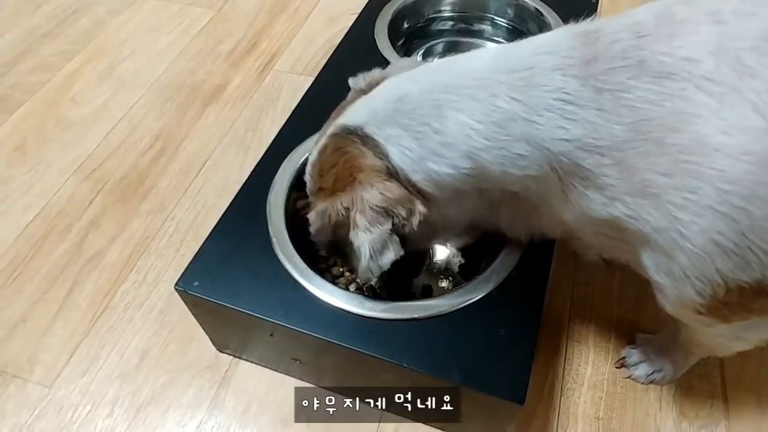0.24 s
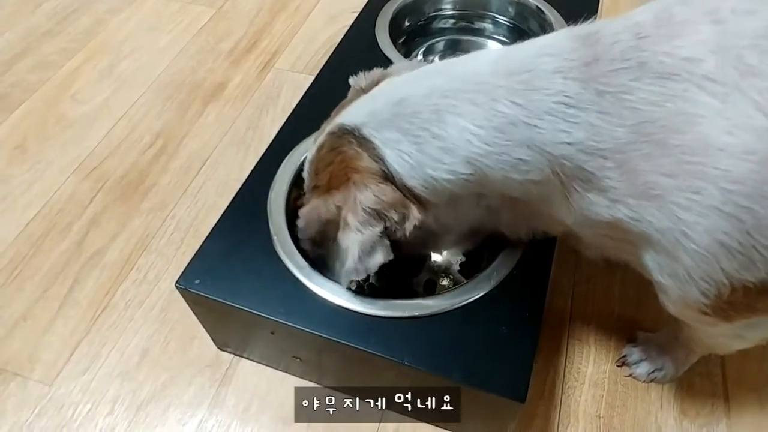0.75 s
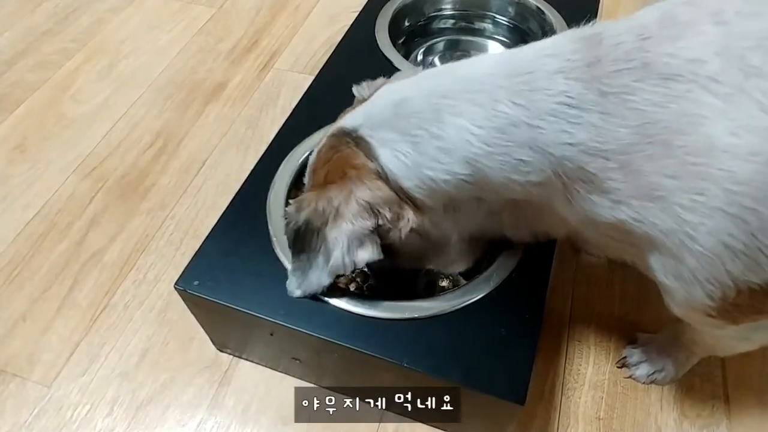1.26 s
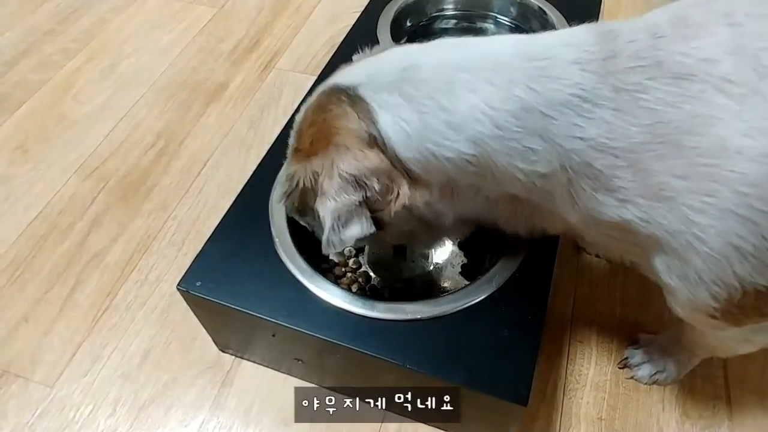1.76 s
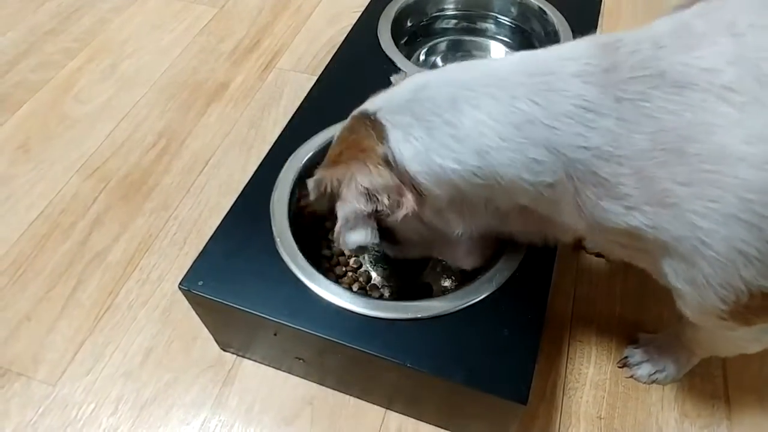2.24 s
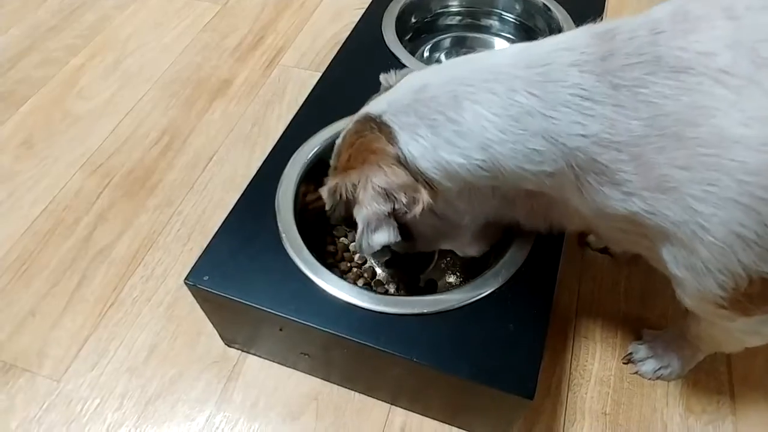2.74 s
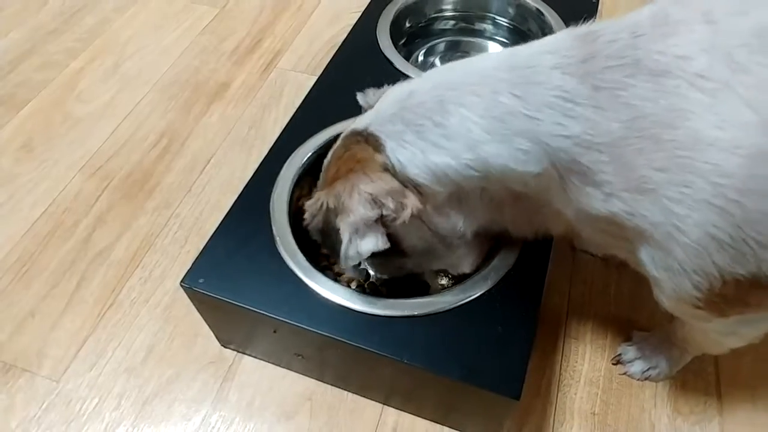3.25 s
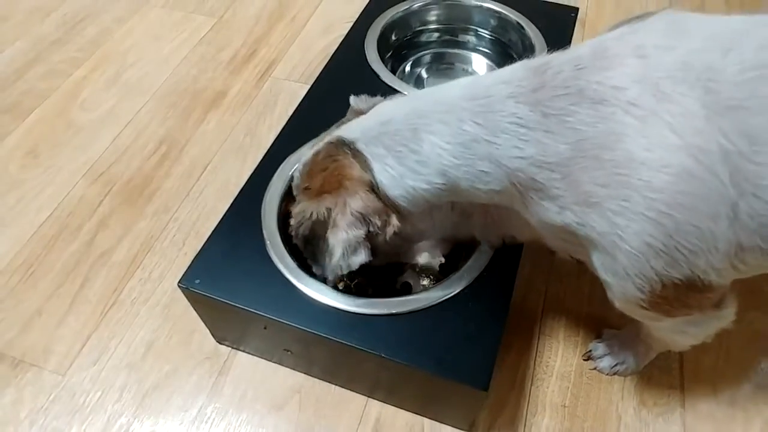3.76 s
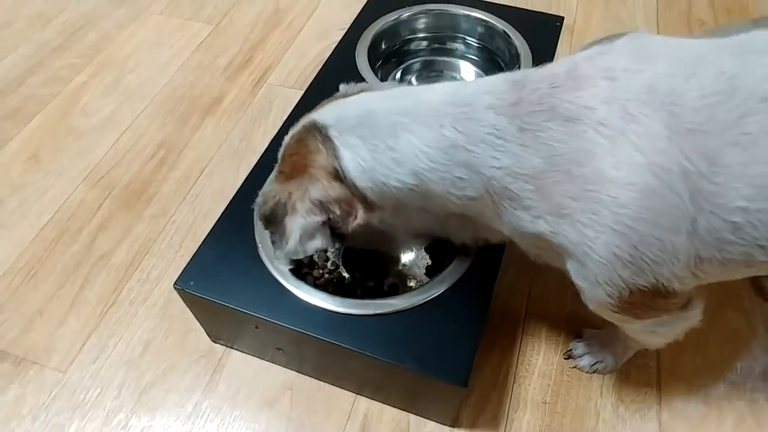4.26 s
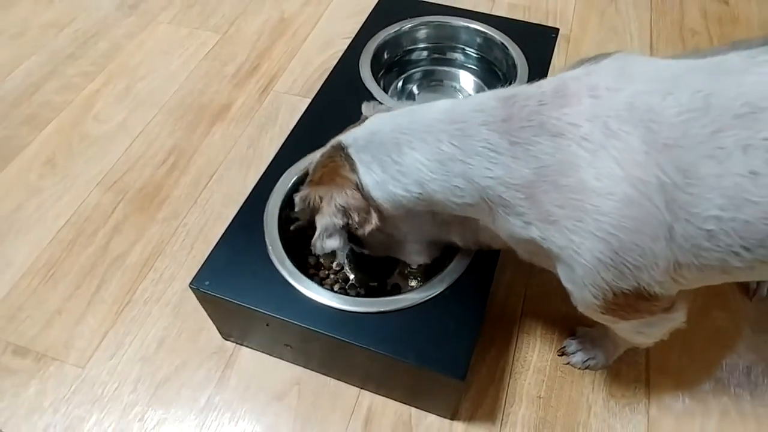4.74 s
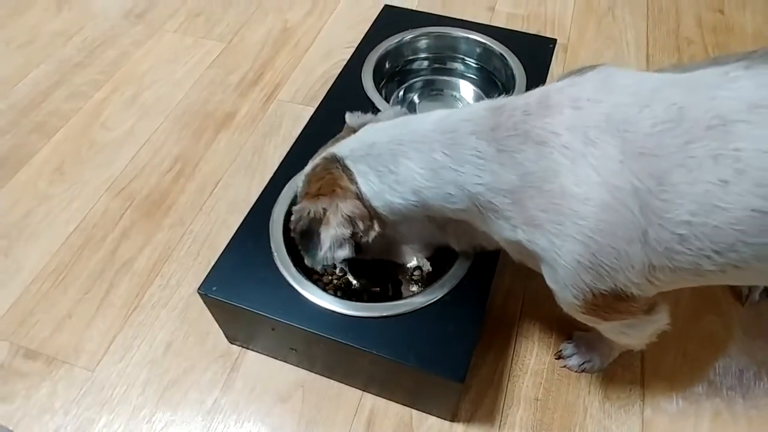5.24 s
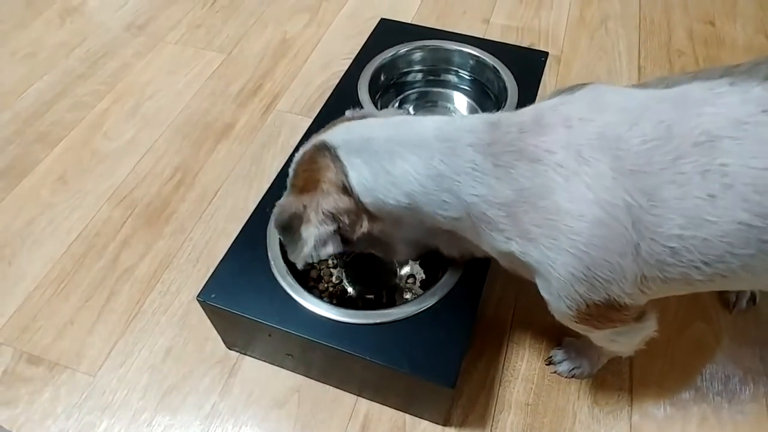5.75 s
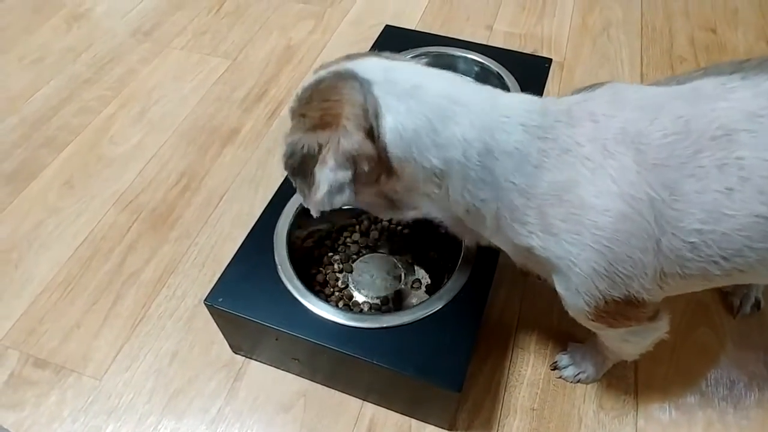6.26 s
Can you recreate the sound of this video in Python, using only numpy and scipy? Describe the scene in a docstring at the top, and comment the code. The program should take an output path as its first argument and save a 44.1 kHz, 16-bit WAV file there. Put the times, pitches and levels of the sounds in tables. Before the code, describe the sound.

A small dog eats dry kibble from a steel bowl in a hard-floored room. A sharp clink comes almost at once, then scattered crunches and soft wet smacks. A metal tag clanks on the bowl around 1.6 seconds. After a quieter stretch, louder knocks and ringing come near 4 and 4.7 seconds, then thin out. Close stereo microphone, short room reflections, faint rumble and hiss.

```python
"""A small dog eats dry kibble from a steel bowl set in a stand, in a room with a hard floor.
From the start: rumble, hiss and drone of filtered noise, and faint jaw ticks until 5.5 s.
From 0.07 s: teeth and pellets knock (band-passed contacts); the tongue smacks and stirs (resonant ticks).
From 0.14 s: square hits ring the bowl (decaying sines). At 0.18 s and twice near 1.6 s: a loose piece of
metal, probably a collar tag, clanks on it (crack, decaying sines, buzz). The room reflects all eating sounds."""
import sys
import numpy as np
from scipy import signal
from scipy.io import wavfile

SR = 44100
rng = np.random.default_rng(int(sys.argv[2]) if len(sys.argv) > 2 else 0)


def to_wav(sig):
    """Store sig (one row per channel, or 1-D mono) as 16-bit WAV at the path in sys.argv[1].

    Samples outside -1..1 are clipped; the rate is SR.
    """
    pcm = np.clip(np.atleast_2d(sig), -1, 1) * 32767
    pcm = np.round(pcm).astype(np.int16)
    wavfile.write(sys.argv[1], SR, pcm.T)  # frames by channels


N = 286650

# room tone spectrum, relative: centre_hz, density_db [dB per Hz]
ROOM_TONE_SPECTRUM = [(12, -40), (20, -10), (64, 3), (103, -20), (151, -15), (511, -39), (3000, -58),
                      (4700, -43), (6600, -62), (9500, -57), (13000, -72), (15000, -75)]
# left-right correlation of the room tone: centre_hz, correlation [-1..1]
ROOM_TONE_LIKENESS = [(30, 0.22), (70, 0.53), (150, 0.51), (400, 0.5), (1500, 0.18), (8000, 0.085)]
# swell of the lowest rumble, only its shape about the mean is used: time_s, level_db
RUMBLE_SWELL = [(0.0, -59.5), (1.41, -65.5), (2.79, -61.5), (3.31, -65), (6.06, -63.5), (6.5, -60.5)]
# low drone of the room: centre_hz, width_hz, level_db
DRONE_BANDS = [(49.6, 4, -66.5), (72.5, 9.5, -66.5), (154.3, 31, -63.5), (292, 6.7, -74)]
# steel bowl modes: pitch_hz, relative_db, t60_s
BOWL_MODES = [(475, -17, .18), (632, -12, .2), (739, -14, .2), (1290, -16, .17), (1545, -15, .17),
              (1952, -9, .24), (2466, -14, .15), (2772, -11, .15), (3086, 0, .19), (3420, -16, .15),
              (3790, -11, .2), (3973, -17, .14), (4413, 1, .16), (4445, -3, .09), (4560, -14, .13),
              (5039, -11, .2), (5157, -16, .2), (5868, -17, .19), (6150, -23, .15), (7072, -11, .19),
              (7480, -17, .14), (7677, -19, .18), (9810, -23, .11)]
# room decay: centre_hz, t60_s
ROOM_DECAY = [(300, 0.19), (600, 0.24), (1400, 0.22), (3000, 0.26), (6000, 0.17), (12000, 0.18)]
# reverberation over direct sound: centre_hz, level_db
ROOM_LEVEL = [(300, -5), (450, 1), (750, -2), (1400, -5), (3000, -6.5), (6000, -6), (12000, -9)]
# teeth and pellets on the bowl: start_s, strength_db [relative], hardness_db [treble over bass]
KNOCKS = [(0.0684, -43.5, -12.5), (0.1405, -16, 11.5), (0.1822, -37.5, 7), (0.2544, -26.5, 1),
          (0.268, -36, -14), (0.4842, -45.5, 4.5), (0.586, -42.5, 1.5), (0.6026, -54, 16),
          (0.6169, -23.5, -3.5), (0.6654, -40.5, -22), (0.8361, -39.5, -1), (0.8435, -41.5, 6.5),
          (0.892, -35.5, -2.5), (0.982, -53.5, -0.5), (1.1944, -54, -17), (1.4902, -46, -10),
          (1.534, -62.5, 19.5), (1.573, -34, -8), (1.5779, -31.5, 7.5), (1.6484, -17.5, 10.5),
          (1.786, -40, -0.5), (1.8091, -35.5, -10.5), (2.1262, -46, -15), (2.41, -50, -18),
          (2.4541, -49.5, -14), (2.5257, -53.5, -13), (2.6674, -28.5, 1), (2.7029, -27, -7),
          (2.7884, -31.5, -7.5), (2.972, -51, -2.5), (3.1166, -56, 12), (3.2032, -69, 18),
          (3.2263, -61, 16), (3.499, -39.5, -4.5), (3.5504, -38.5, -14), (3.7925, -41.5, -1.5),
          (3.9516, -29.5, 1), (3.9785, -16, -2), (4.0225, -26.5, -1), (4.2257, -24.5, 3.5),
          (4.4776, -44, -2), (4.6353, -29, -11.5), (4.6701, -25.5, -4), (4.6772, -26, -0.5),
          (4.699, -20.5, 4.5), (4.7807, -36, -9), (4.8312, -30, 11), (4.838, -37.5, 13),
          (5.0276, -27.5, 4.5), (5.069, -24.5, -1), (5.3512, -51, 13.5), (5.4037, -51, 11),
          (5.5888, -29.5, 2.5), (5.6142, -27, -1.5), (5.9086, -51, -5), (6.3406, -62, -10)]
# registers of a knock, thud to snap: low_hz, high_hz, crumble_t60_s, relative_db,
# hardness_share [dB per dB of hardness], pan_db [left over right]
KNOCK_REGISTERS = [(470, 1000, 0.013, 0.32, 0, 1.5), (1250, 2000, 0.0065, -1, 0.035, 2.5),
                   (2530, 3000, .011, -0.5, 0.92, -9.5), (3360, 6000, 0.025, -13.5, 1.0, 11),
                   (7400, 8800, 0.0054, -24, .5, 3)]
# tongue strokes: start_s, length_s, smack_db [relative], rustle_db [relative to smack]
TONGUE_STROKES = [(0.074, .06, -50, -2.5), (0.415, .073, -54, -19), (0.554, .058, -41, -19),
                  (0.812, .044, -49.5, -18), (1.021, .03, -57.5, -12.5), (1.124, .036, -60, -13.5),
                  (1.297, .06, -47.5, -13), (1.351, .078, -53.5, -16.5), (1.493, .1, -52, -5),
                  (2.099, .062, -59.5, -4.5), (2.3, .19, -58, -16.5), (2.602, .07, -52, -17.5),
                  (2.68, .075, -39.5, -8), (2.8, .1, -55.5, -19), (3.069, .045, -49, -10.5),
                  (3.132, .09, -64.5, 3), (3.314, .064, -60.5, -10), (3.523, .09, -51.5, -11),
                  (3.758, .096, -49.5, -5), (3.926, .06, -44.5, -8), (3.993, .03, -36, 1),
                  (4.361, .068, -59.5, -7.5), (4.577, .085, -39, -14.5), (4.698, .02, -27.5, -2.5),
                  (4.735, .06, -37, -8.5), (4.861, .09, -42.5, -7.5), (4.993, .075, -41.5, -9),
                  (5.324, .053, -56.5, -3), (5.485, .1, -48.5, -10.5), (5.594, .07, -43, -3.5)]
# square hits on the bowl wall: start_s, strength_db [relative]
BOWL_HITS = [(0.1412, -45.5), (0.8435, -40.5), (1.6487, -31.5), (2.6674, -35), (3.9785, -18),
             (4.6779, -23.5), (4.6985, -32.5), (5.069, -34.5), (5.3513, -60), (5.6142, -52.5)]
# collar tag against the bowl: start_s, strength_db [relative]
TAG_HITS = [(0.183, -28.5), (1.5777, -23), (1.65, -31)]
# collar tag modes: pitch_hz, relative_db, t60_s
TAG_MODES = [(1760, -4, .28), (1885, -5, .3), (2062, -17, .25), (2272, -13, .3), (2507, -2, .17),
             (2790, -9, .17), (3128, -14, .22), (3499, -14, .3), (3651, -4, .24), (3715, -6, .2),
             (3838, -8, .22), (4037, -10, .2), (4242, -15, .22), (4885, -5, .26), (5308, -7, .17),
             (5450, -9, .15), (6062, -14, .25), (6998, -14, .2), (8190, -12, .17), (8269, -10, .18),
             (8565, -17, .17), (9523, -21, .14), (10170, -20, .2)]


def from_db(db):
    """Decibels to amplitude."""
    return 10 ** (np.asarray(db) / 20)


def rms_one(x):
    """Scales to unit rms."""
    return x / np.sqrt(np.mean(x ** 2) + 1e-20)


def at_hz(points, hz):
    """Reads a table on a log-frequency axis."""
    points = np.array(points)
    return np.interp(np.log(hz), np.log(points[:, 0]), points[:, 1])


def butter(x, hz, kind, order=2):
    """Causal Butterworth filter."""
    hz = np.clip(hz, 10, SR / 2 - 500)
    return signal.sosfilt(signal.butter(order, hz, kind, fs=SR, output="sos"), x)


def panned(x, pan_db):
    """Sets left over right at constant power; mono becomes stereo."""
    return rms_one(from_db([[pan_db / 2], [-pan_db / 2]])) * x


def add(out, start_s, sound):
    """Mixes a sound in at a given time."""
    i = round(start_s * SR)
    out[..., i:i + sound.shape[-1]] += sound[..., :N - i]


def noise_bands(size, count=19):
    """Half-octave bands of noise, as (centre Hz, 2 unrelated channels x size); neighbours are unrelated."""
    white = rng.standard_normal((2, 2, size + SR // 2))
    edges_hz = 22 * 2 ** (np.arange(count + 1) / 2)
    for k, (low_hz, high_hz) in enumerate(zip(edges_hz, edges_hz[1:])):
        band = butter(white[k % 2], [low_hz, high_hz], "band")
        yield np.sqrt(low_hz * high_hz), band[:, -size:]   # filter onset dropped


def correlated(mid, side, likeness):
    """Two noises to a stereo pair of given correlation."""
    return np.sqrt(1 + likeness) * mid + np.sqrt(1 - likeness) * side * [[1], [-1]]


def grains(size, per_s, spread_db):
    """Random tiny contacts of uneven strength and either sign."""
    strength = from_db(spread_db * np.minimum(rng.exponential(1, size), 3.5))
    return (rng.random(size) < per_s / SR) * strength * rng.choice([-1, 1], size)


def room_tone(level_db=-60, pan_db=-2.0, rumble_top_hz=90, swell_share=.8):
    """Low rumble that swells and sinks, under a faint even hiss: noise bands, partly alike left and right."""
    rumble_db = np.interp(np.arange(N) / SR, *np.transpose(RUMBLE_SWELL))
    swell = from_db(swell_share * (rumble_db - rumble_db.mean()))
    out = 0
    for hz, (mid, side) in noise_bands(N):
        gain = from_db(at_hz(ROOM_TONE_SPECTRUM, hz)) * (swell if hz < rumble_top_hz else 1)
        out = out + gain * correlated(mid, side, at_hz(ROOM_TONE_LIKENESS, hz))
    return panned(from_db(level_db) * rms_one(out), pan_db)


def drone(apart=0.75, pan_db=-1.5):
    """Narrow bands of noise, largely alike left and right."""
    white = rng.standard_normal(N + SR) + apart * rng.standard_normal((2, N + SR))
    out = 0
    for hz, width_hz, db in DRONE_BANDS:
        band = butter(white, [hz - width_hz / 2, hz + width_hz / 2], "band", order=1)
        out = out + from_db(db) * rms_one(band[:, SR:])
    return panned(out, pan_db)


def chewing(end_s=5.5, level_db=-71.0):
    """Faint dull ticks of the jaws, band-passed grains, until the dog lifts its head."""
    ticks = butter(grains(N, per_s=120, spread_db=4), [550, 2100], "band")
    return from_db(level_db) * rms_one(ticks) * (np.arange(N) < end_s * SR)


def mode_ring(modes, damped_db, damped_t60_s, contact_s=.0002):
    """One blow: modes of uneven strength, losing energy fast while the contact lasts, then ringing freely."""
    t = np.arange(SR // 2) / SR
    out = 0
    for hz, mode_db, t60_s in modes:
        strength = from_db(mode_db + rng.uniform(-0.24, 0.67, (2, 1)) - 60 * t / t60_s)
        skew_rad = rng.normal(0, 0.068) * np.array([[1], [-1]])   # small left-right phase offset per mode
        out = out + strength * np.sin(2 * np.pi * hz * t + skew_rad) * rng.choice([-1, 1])
    damped = from_db(damped_db - 60 * t / damped_t60_s)
    rise = 1 - np.exp(-t / contact_s)
    return out * (1 + damped) * rise


def bowl_colour(x, level_db=-20.5):
    """Contacts and mouth sounds in the bowl set its modes ringing a little, by convolution."""
    response = mode_ring(BOWL_MODES, damped_db=-0.5, damped_t60_s=0.041)
    response *= np.sqrt(2) / np.linalg.norm(response)
    return from_db(level_db) * signal.fftconvolve(x, response, axes=1)[:, :N]


def room(x, likeness=0.24, alike_below_hz=450, build_s=0.0029):
    """Dense reflections from bowl, floor and walls build up within ms and die away by band."""
    t = np.arange(SR // 2) / SR
    build = 1 - np.exp(-(t / build_s) ** 2)
    response = 0
    for hz, (mid, side) in noise_bands(len(t)):
        # long waves arrive alike left and right
        alike = min(likeness + 1 / (1 + (hz / alike_below_hz) ** 2), .95)
        decay = from_db(-60 * t / at_hz(ROOM_DECAY, hz)) * build
        envelope = decay / np.linalg.norm(decay) * from_db(at_hz(ROOM_LEVEL, hz))
        response = response + correlated(mid, side, alike) / np.sqrt(2) * envelope
    return signal.fftconvolve(x, response, axes=1)[:, :N]


def stand_thump(mouth, level_db=-10, top_hz=340):
    """The stand adds a dull thump: the low end of the contacts and mouth sounds, in mono."""
    return from_db(level_db) * butter(mouth.mean(axis=0), top_hz, "low")


def contact(register, crumble=1.8, level_db=-3.5, level_over_s=.008, rise_s=0.00023, pan_scatter_db=2.5):
    """A sharp contact and a few ms of crumbling in one register; no two are at quite the same spot."""
    low_hz, high_hz, t60_s, _, _, pan_db = register
    t = np.arange(SR // 32) / SR
    envelope = from_db(-60 * t / t60_s) * (1 - np.exp(-t / rise_s))
    force = grains(len(t), per_s=9000, spread_db=2.5) * envelope
    force *= crumble / np.linalg.norm(force)
    force[0] += 1   # the sharp contact
    sound = butter(force, [low_hz, high_hz], "band")
    sound *= from_db(level_db) * np.sqrt(level_over_s * SR) / np.linalg.norm(sound)
    return panned(sound, pan_db + pan_scatter_db * rng.standard_normal())


def knocks(events, top_hz=11300):
    """Every knock sounds every register; the harder the contact, the stronger the upper ones."""
    out = np.zeros((2, N))
    for start_s, strength_db, hardness_db in events:
        sound = 0
        for register in KNOCK_REGISTERS:
            relative_db, hardness_share = register[3:5]
            gain = from_db(strength_db + relative_db + hardness_share * hardness_db)
            sound = sound + gain * contact(register)
        sound[1] = np.roll(sound[1], rng.integers(3))   # path to the right differs by spot: 0-2 samples
        add(out, start_s, sound)
    return butter(out, top_hz, "low", order=8)


def crackle(size, centre_hz, scatter, per_s, count=5):
    """Sparse ticks dealt to a few short resonances scattered around one pitch; rms 1."""
    offsets = np.linspace(-1, 1, count) + rng.normal(0, .2, count)
    out = 0
    for hz in centre_hz * np.exp(scatter * offsets):
        ticks = grains(size, per_s / count, spread_db=5)
        out = out + butter(ticks, [hz * .88, hz * 1.12], "band")
    return rms_one(out)


def licks(wet_db=-5.5, squelch_db=-8, rustle_offset_db=-2.5, pan_db=-2.5):
    """Wet ticks resonate in the mouth, with a narrow squelch, while pellets rub; strokes swell and fade."""
    squelch_width_hz, taper = 200, 0.8
    out = np.zeros(N)
    for start_s, length_s, smack_db, rustle_db in TONGUE_STROKES:
        size = round(length_s * SR)
        mouth_hz = 1367 * np.exp(0.029 * rng.standard_normal())   # varies from stroke to stroke
        wet = crackle(size, mouth_hz, scatter=.27, per_s=800)
        rustle = crackle(size, 3500, scatter=0.12, per_s=1200)
        squelch_hz = [mouth_hz - squelch_width_hz / 2, mouth_hz + squelch_width_hz / 2]
        squelch = rms_one(butter(wet, squelch_hz, "band", order=1))   # narrow ring of the mouth cavity
        stroke = from_db(wet_db) * wet + from_db(squelch_db) * squelch
        stroke = stroke + from_db(rustle_db + rustle_offset_db) * rustle
        envelope = rms_one(signal.windows.tukey(size, taper))
        add(out, start_s, from_db(smack_db) * stroke * envelope)
    return panned(out, pan_db)


def nudged_pellets(per_s=30, level_db=1.5, scatter_db=2.5, hardness_offset_db=2.5):
    """Each tongue stroke tips a few pellets over at random: small knocks that follow its force and rustle."""
    events = []
    for start_s, length_s, smack_db, rustle_db in TONGUE_STROKES:
        count = round(length_s * per_s)
        for s in start_s + length_s * (np.arange(count) + rng.random(count)) / count:
            strength_db = smack_db + level_db + scatter_db * rng.standard_normal()
            events.append((s, strength_db, rustle_db + hardness_offset_db))
    return events


def ringing(hits, modes, level_db, damped_db, damped_t60_s):
    """A piece of metal struck several times."""
    out = np.zeros((2, N))
    for start_s, strength_db in hits:
        add(out, start_s, from_db(strength_db + level_db) * mode_ring(modes, damped_db, damped_t60_s))
    return out


def bowl_ring():
    """Square hits set the steel bowl's modes ringing."""
    return ringing(BOWL_HITS, BOWL_MODES, level_db=-6.5, damped_db=3.0, damped_t60_s=0.065)


def tag_cracks(level_db=9.5, top_hz=10000):
    """Metal lands on metal with a crack in one upper treble register alone."""
    out = np.zeros((2, N))
    for start_s, strength_db in TAG_HITS:
        add(out, start_s, from_db(strength_db + level_db) * contact(KNOCK_REGISTERS[-2]))
    return butter(out, top_hz, "low", order=6)


def tag_ring():
    """The tag's main modes ring at each landing."""
    return ringing(TAG_HITS, TAG_MODES, level_db=-3, damped_db=-4.5, damped_t60_s=0.034)


def tag_overtones(level_db=-13.0, low_hz=3300, high_hz=10400, count=48):
    """The tag's many weak overtones: thin, uneven lines, the higher ones fainter and shorter."""
    fall_db_per_octave, low_t60_s, shortening = 7.5, 0.38, .8
    hz = np.geomspace(low_hz, high_hz, count) * np.exp(rng.normal(0, .01, count))
    db = 4 * rng.standard_normal(count) - fall_db_per_octave * np.log2(hz / low_hz)
    t60_s = low_t60_s * (low_hz / hz) ** shortening
    modes = np.transpose([hz, db, t60_s])
    return ringing(TAG_HITS, modes, level_db, damped_db=-7.5, damped_t60_s=0.026)


def tag_chatter(level_db=-5.0, t60_s=0.2):
    """The tag buzzes against the steel for a moment after it lands: dense grains, unrelated left and right."""
    out = np.zeros((2, N))
    t = np.arange(SR // 3) / SR
    for start_s, strength_db in TAG_HITS:
        contacts = np.array([grains(len(t), per_s=8400, spread_db=2.5) for side in range(2)])
        buzz = rms_one(butter(contacts, [2300, 5600], "band", order=1))
        add(out, start_s, buzz * from_db(strength_db + level_db - 60 * t / t60_s))
    return butter(butter(out, 10200, "low", order=8), 1300, "high")


def scene(lowest_hz=420):
    """Eating sounds come from the bowl, which radiates little below its lowest resonance; the stand thumps."""
    mouth = knocks(KNOCKS + nudged_pellets()) + tag_cracks() + licks() + chewing()
    metal = panned(bowl_ring() + tag_ring() + tag_overtones(), pan_db=2.0)
    eating = mouth + bowl_colour(mouth) + metal + tag_chatter()
    eating[1] = np.roll(eating[1], 1)   # the left side is slightly nearer: right lags 1 sample
    direct = butter(eating, lowest_hz, "high", order=3)
    reflected = butter(room(eating), lowest_hz, "high", order=10)
    return direct + reflected + stand_thump(mouth) + room_tone() + drone()


def record(dry, stopband_hz=16300):
    """The loudest peaks are rounded, the top is cut."""
    rounded = np.tanh(dry)
    return signal.sosfilt(signal.cheby2(14, 60, stopband_hz, fs=SR, output="sos"), rounded)


dry = scene()
out = record(dry)
to_wav(out)
```